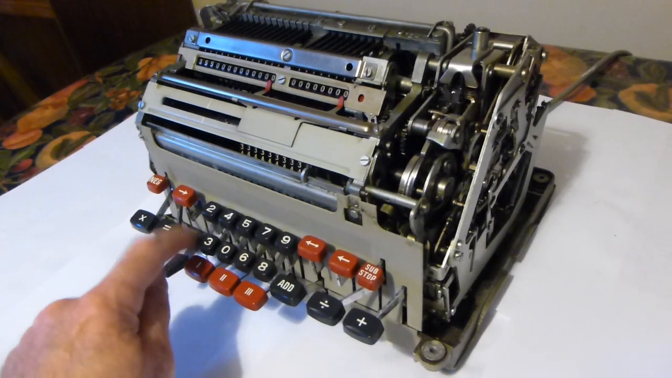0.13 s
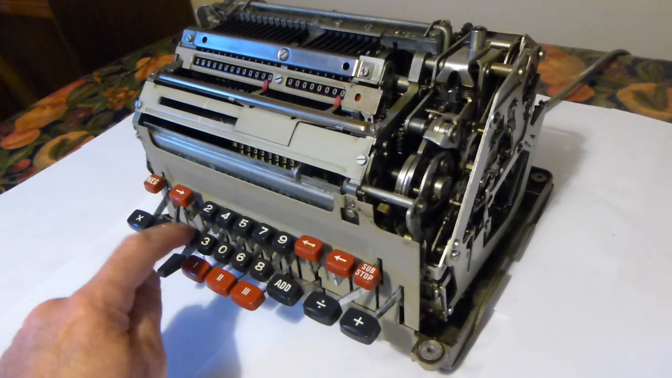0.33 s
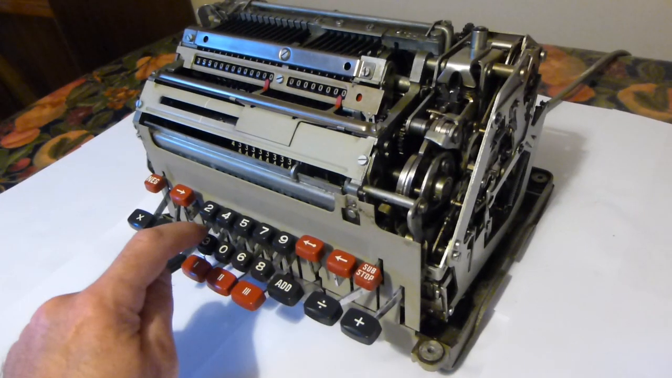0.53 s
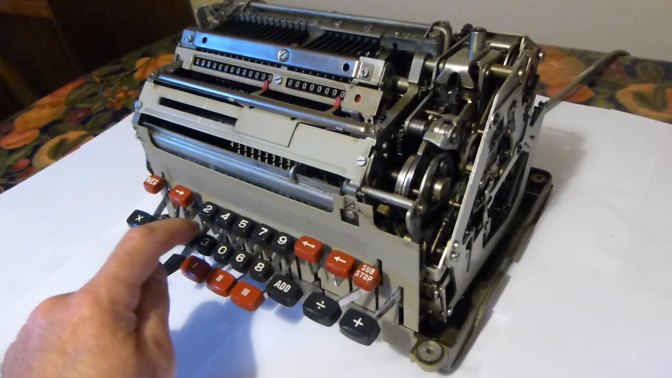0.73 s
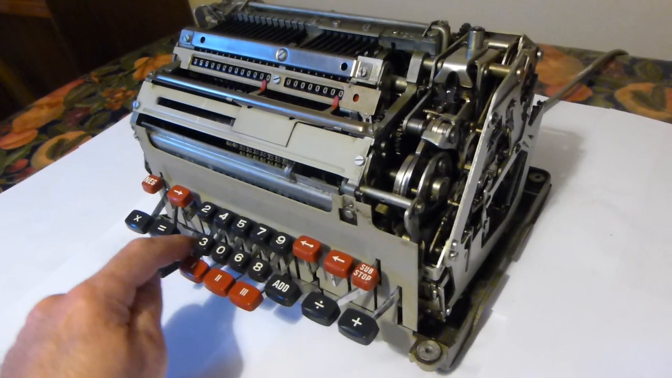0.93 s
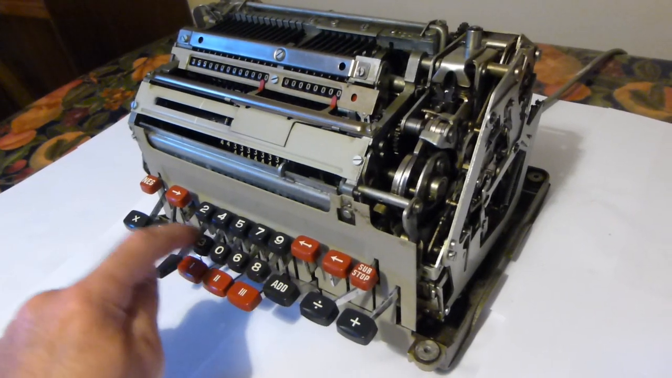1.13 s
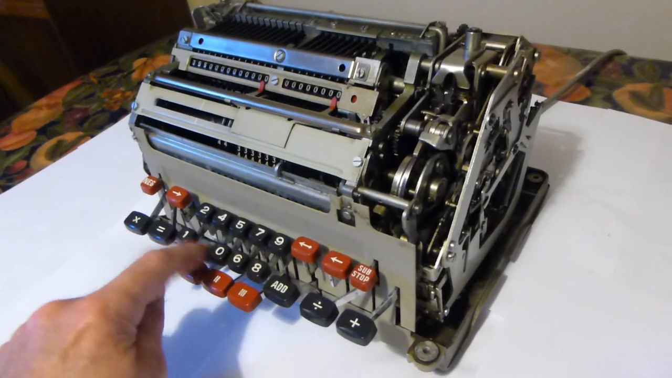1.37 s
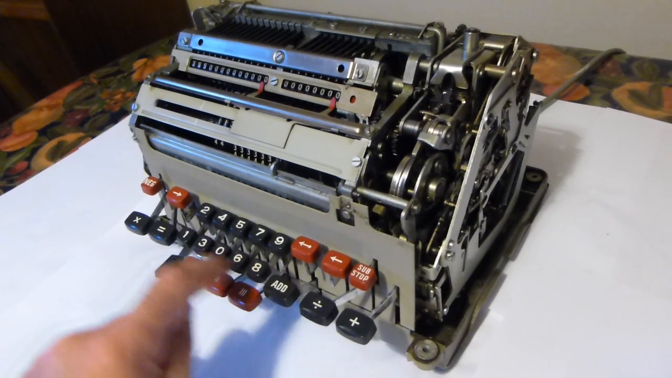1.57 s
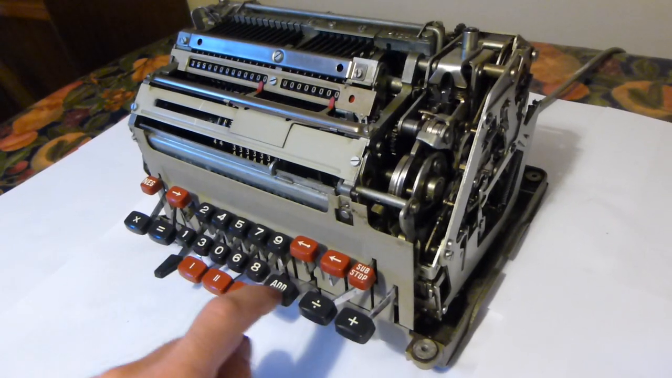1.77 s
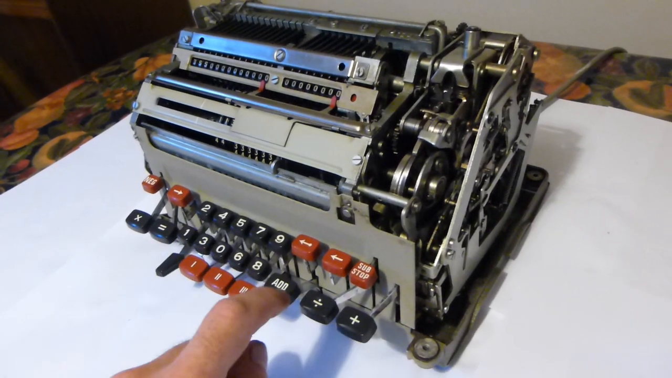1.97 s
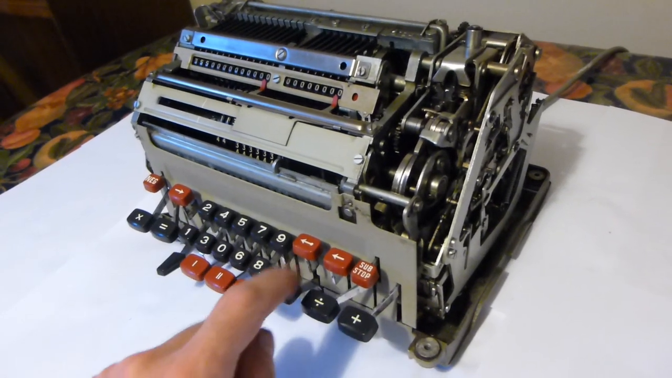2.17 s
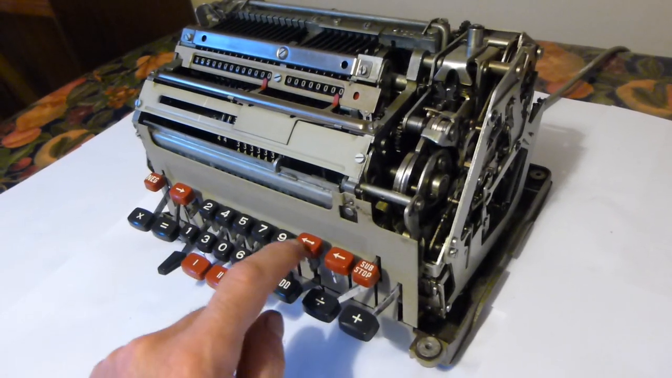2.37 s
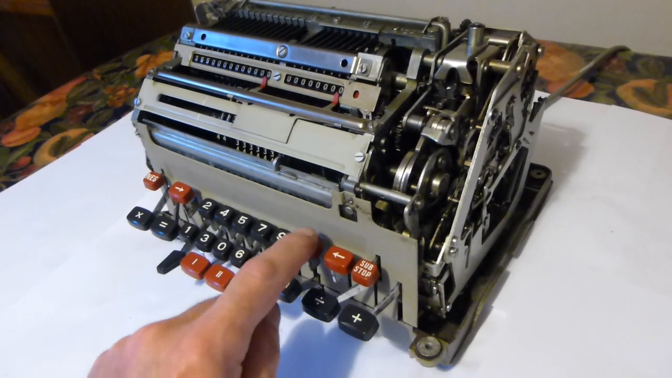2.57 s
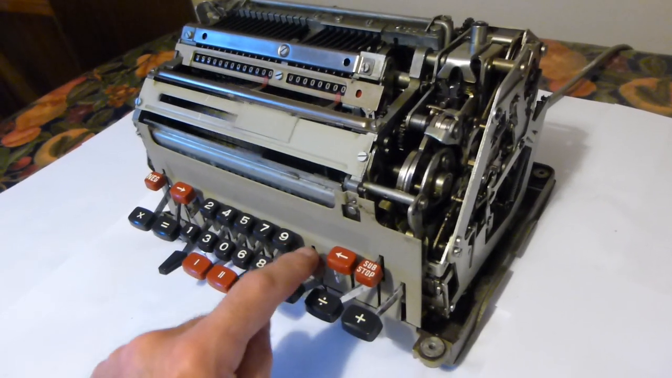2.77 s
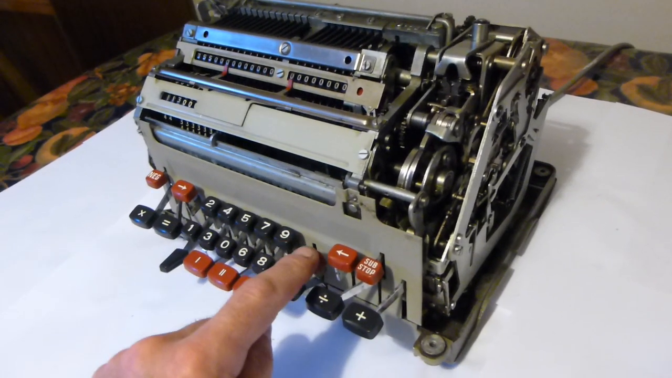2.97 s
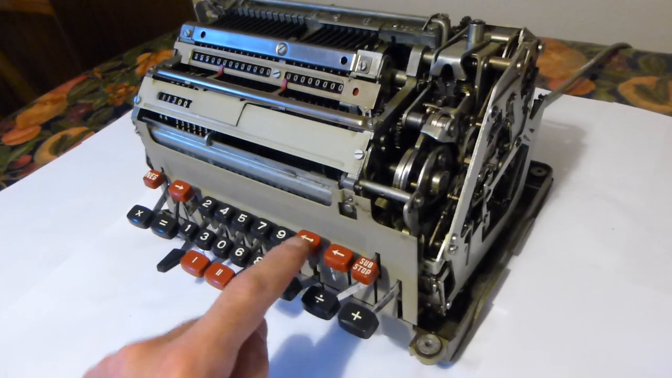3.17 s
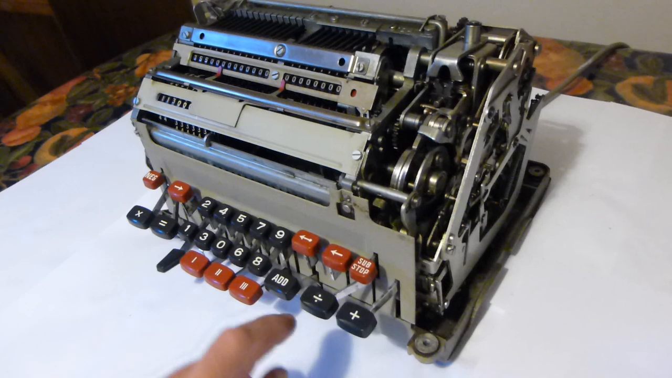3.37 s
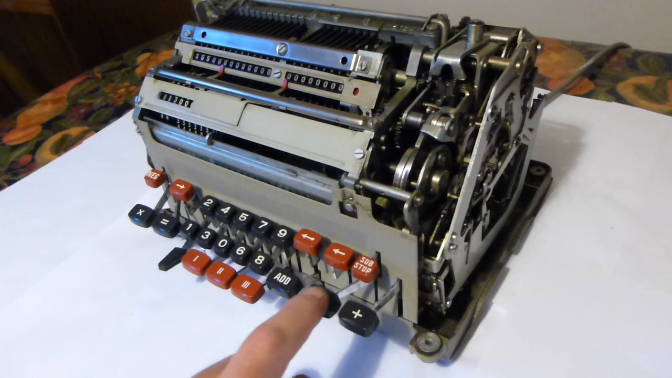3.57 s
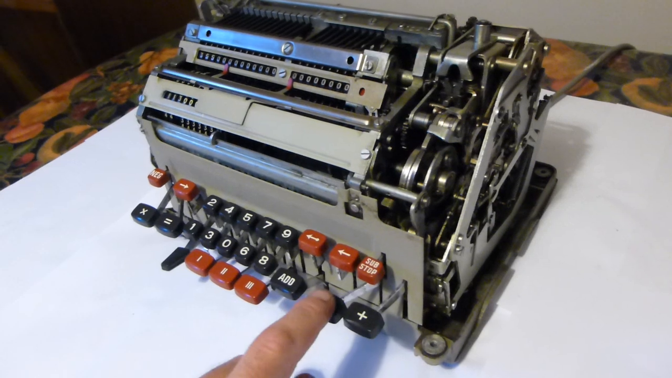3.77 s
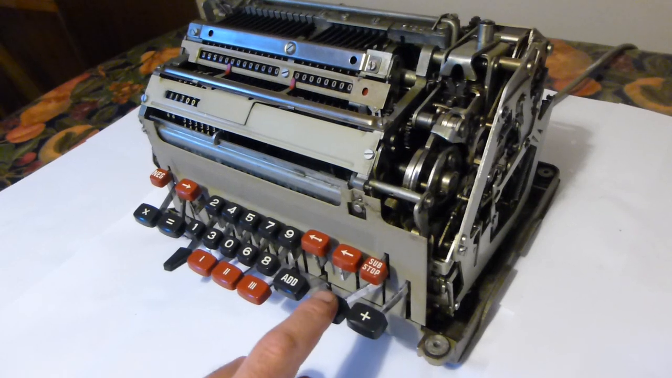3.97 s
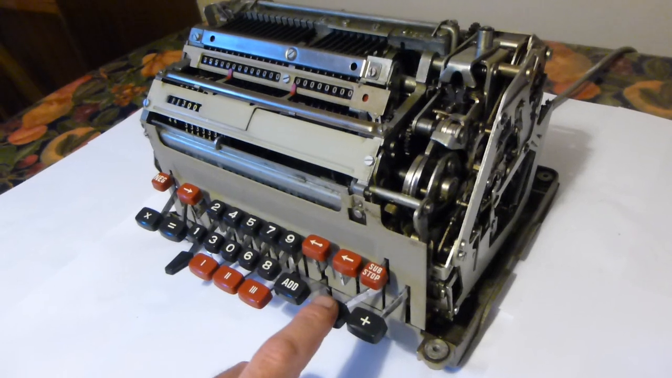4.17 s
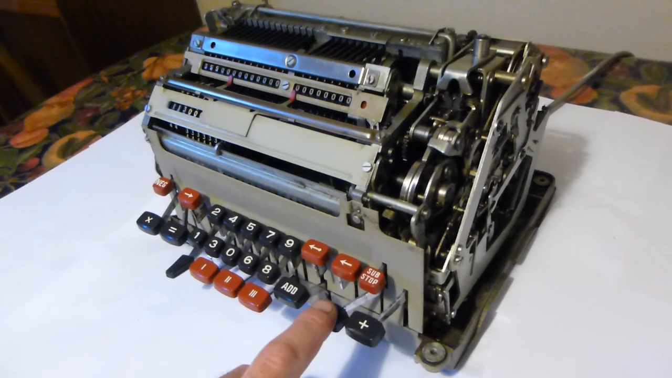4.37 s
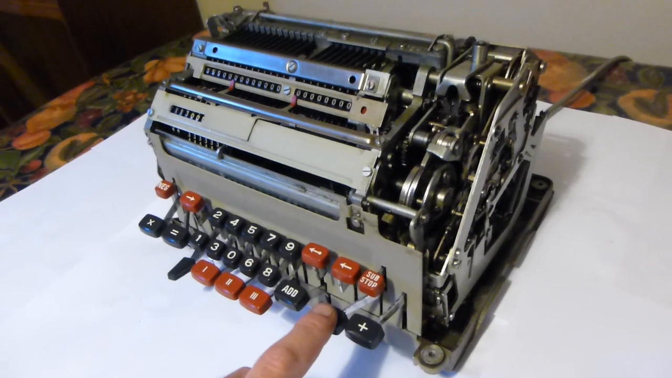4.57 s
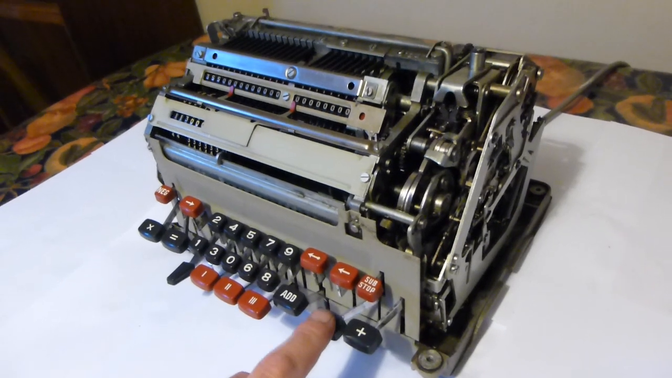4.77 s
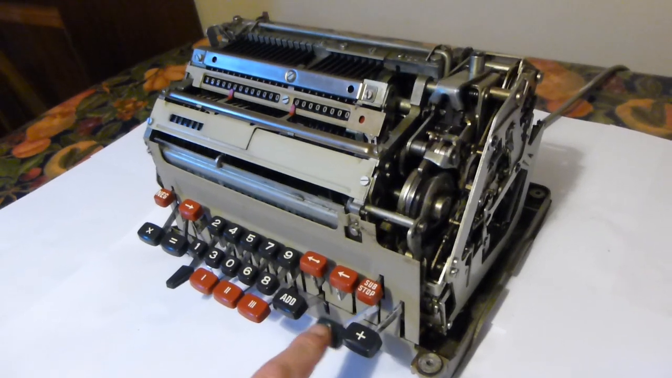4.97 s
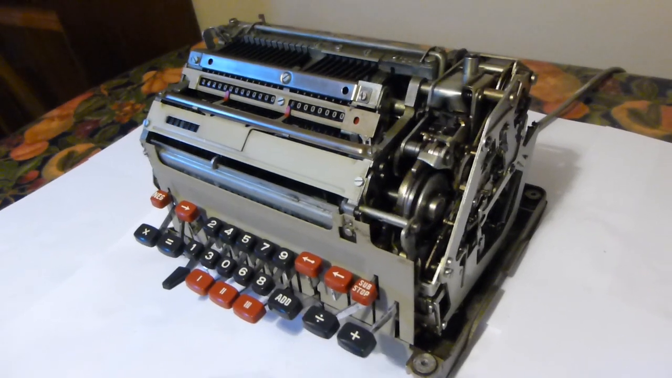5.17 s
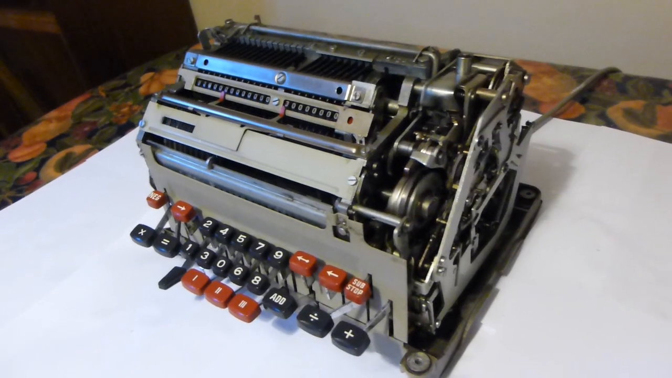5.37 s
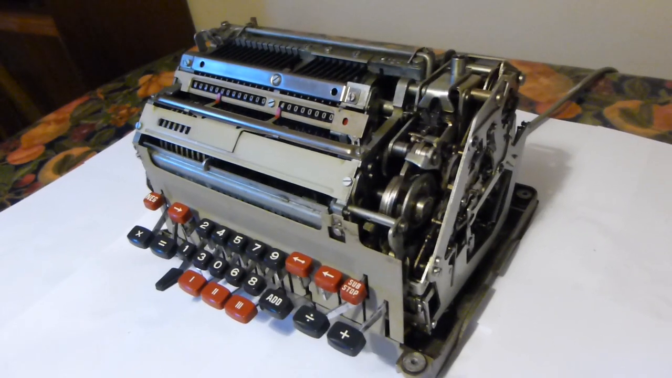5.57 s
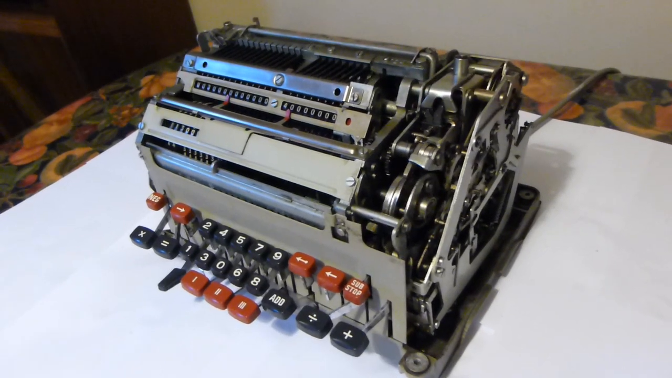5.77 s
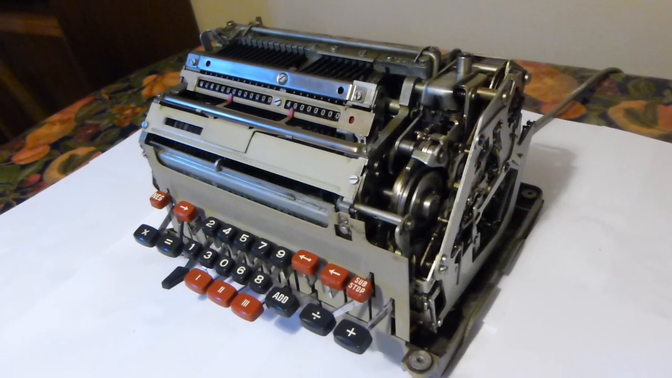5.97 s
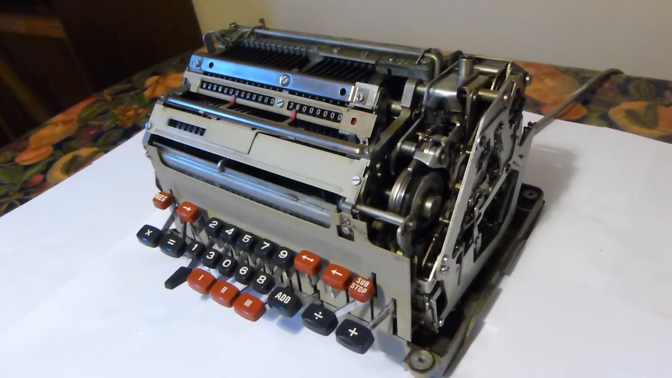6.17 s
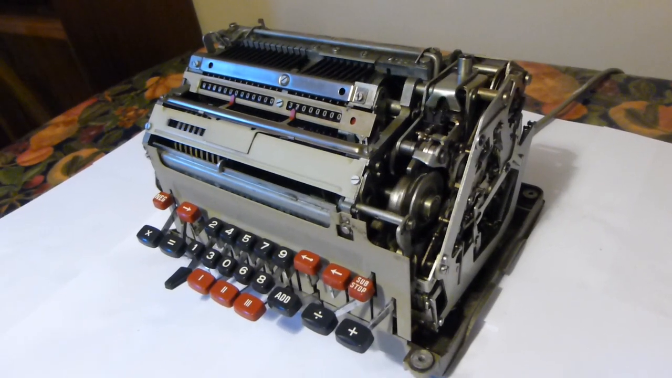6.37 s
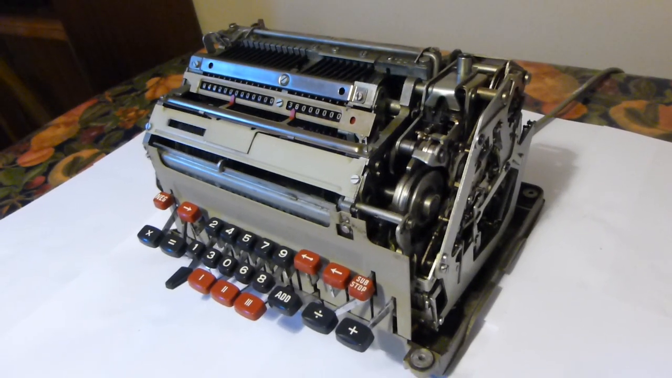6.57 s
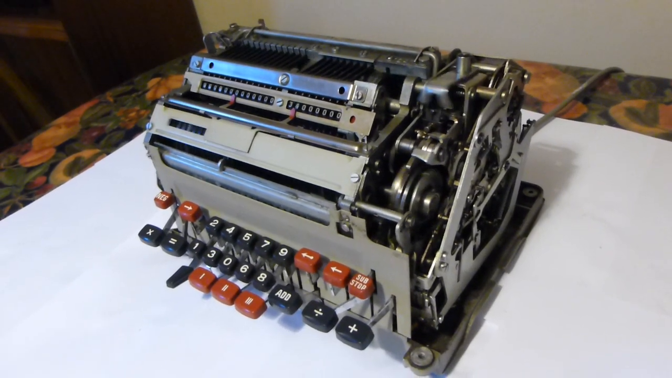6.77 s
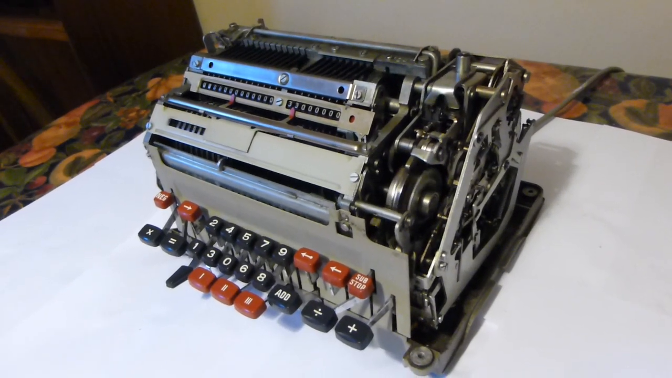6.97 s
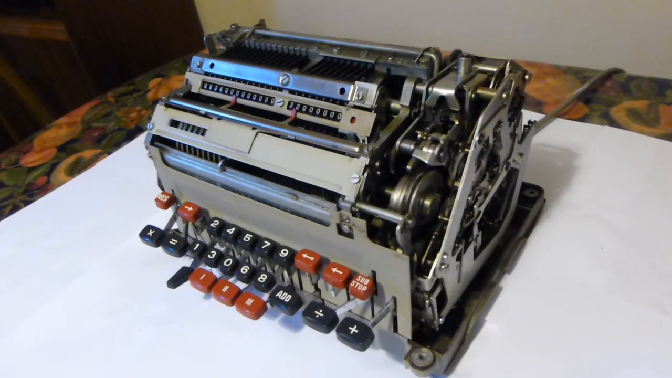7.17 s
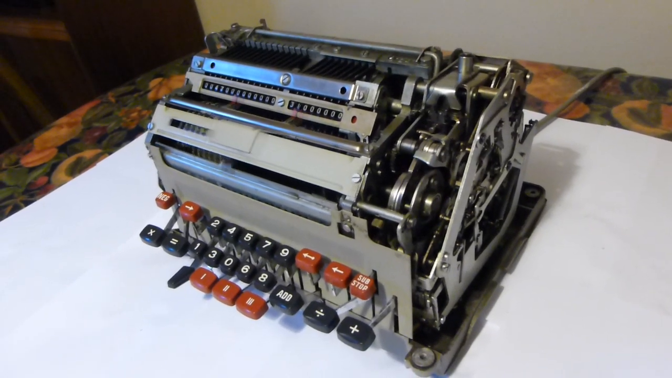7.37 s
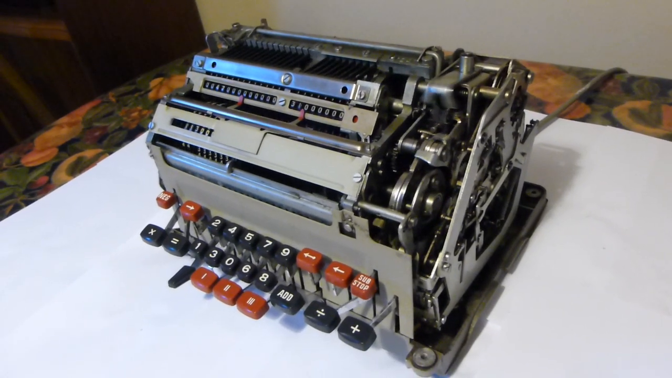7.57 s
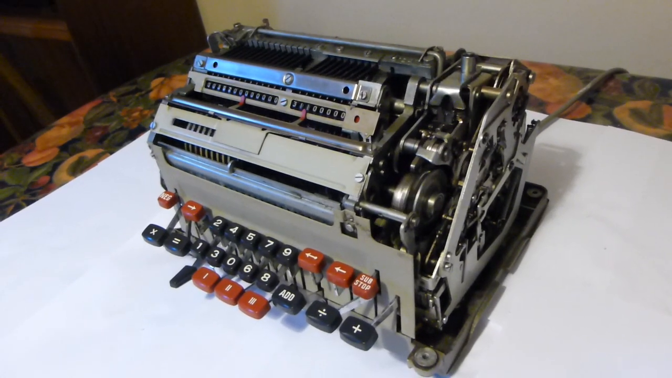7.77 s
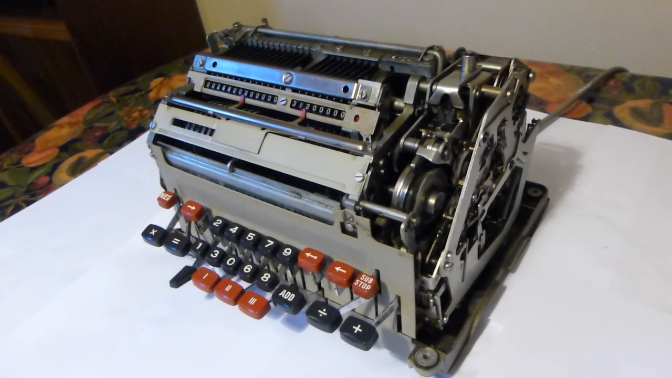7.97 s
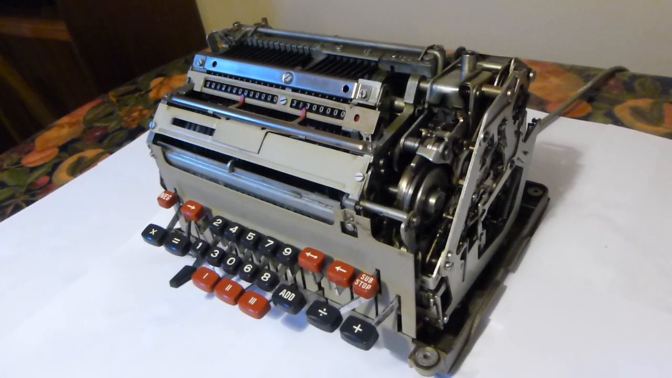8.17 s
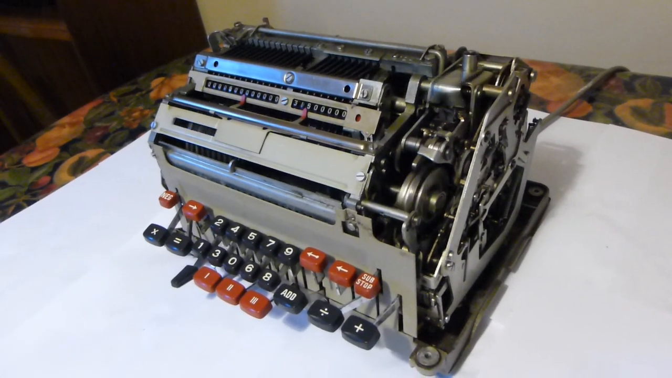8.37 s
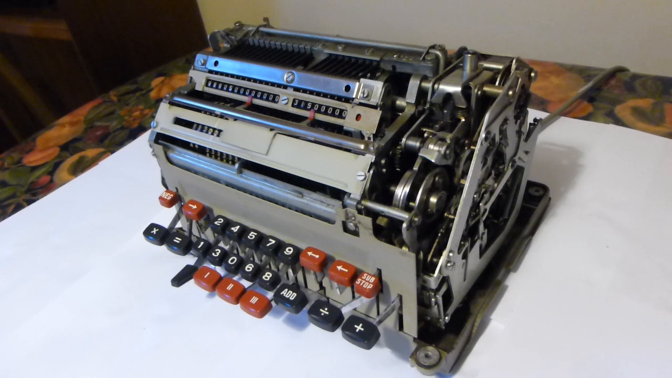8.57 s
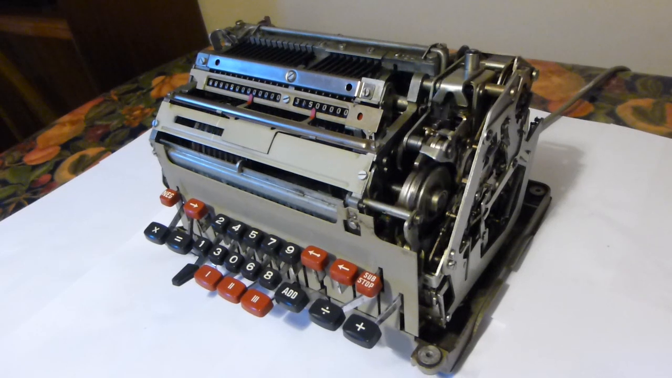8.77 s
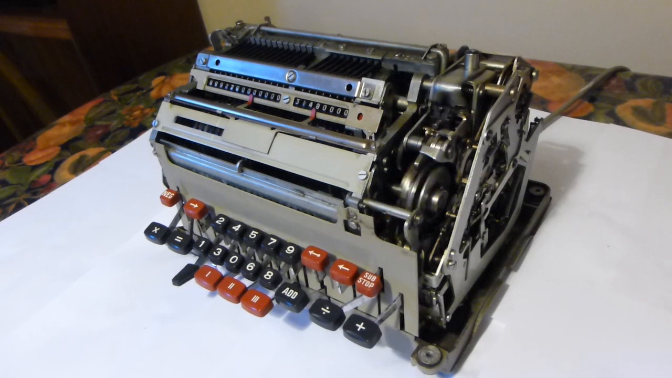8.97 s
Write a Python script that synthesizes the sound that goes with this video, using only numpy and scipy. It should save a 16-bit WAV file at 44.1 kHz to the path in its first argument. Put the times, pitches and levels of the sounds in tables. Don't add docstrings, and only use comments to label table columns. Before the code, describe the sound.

Sharp metallic key clacks and a ratcheting carriage slide, then an electric mechanical calculator clatters fast and rhythmically in a small furnished room.

```python
import sys
import numpy as np
from scipy import signal
from scipy.fft import rfft, irfft, next_fast_len
from scipy.io import wavfile

SR = 44100
rng = np.random.default_rng(int(sys.argv[2]) if len(sys.argv) > 2 else 0)


def attenuation_scalar(level_db):
    decades = np.asarray(level_db, float) / 20
    return 10 ** decades


def generate_wav(signal):
    frames = np.transpose(np.atleast_2d(signal))
    scaled = np.clip(frames, -1, 1) * 32767
    pcm = np.round(scaled).astype(np.int16)
    wavfile.write(sys.argv[1], SR, pcm)


N = 398223
MOTOR_ON_S = 4.885
LEFT_RIGHT = np.array([[1], [-1]])


def rms_one(x):
    return x / np.sqrt(np.mean(x ** 2) + 1e-20)


def at_hz(points, hz):
    points = np.array(points)
    return np.interp(np.log(hz), np.log(points[:, 0]), points[:, 1])


def filtered(x, order, hz, kind):
    return signal.sosfilt(signal.butter(order, hz, kind, fs=SR, output="sos"), x)


def ring(clicks, hz, t60):
    radius, w = attenuation_scalar(-60 / (t60 * SR)), 2 * np.pi * hz / SR
    return signal.lfilter([0, np.sin(w)], [1, -2 * radius * np.cos(w), radius ** 2], clicks + 1e-18)


def coloured(spectrum, likeness):
    size = next_fast_len(N)
    hz = np.maximum(np.arange(size // 2 + 1) * SR / size, 1)
    mid, side = rfft(rng.standard_normal((2, size))) * attenuation_scalar(at_hz(spectrum, hz)) * (hz > 20)
    alike = np.clip(at_hz(likeness, hz), -1, 1)
    both = np.sqrt(1 + alike) * mid + np.sqrt(1 - alike) * side * LEFT_RIGHT
    return rms_one(irfft(both, size)[:, :N])


def contacts(per_s, spread_db):
    sizes = attenuation_scalar(spread_db * np.minimum(rng.exponential(1, N), 4)) * rng.choice([-1, 1], N)
    return rms_one(sizes * (rng.random(N) < per_s / SR))


def lumps(per_s):
    steps = rng.standard_normal(N // 100 + 2)
    r = np.exp(-200 * np.pi * per_s / SR)
    slow = rms_one(signal.lfilter([1], [1, -2 * r, r * r], steps))
    return np.interp(np.arange(N) / 100, np.arange(len(steps)), slow)


# pitch_hz [Hz], level_db [dB per Hz]
AIR = [(15, -27.5), (25, -5.5), (33, -16.5), (92, -17), (206, -13), (236, -9), (270, -13), (384, -13),
       (545, -10.5), (607, -12.5), (1190, -14), (3620, -26.5), (5730, -21.5), (14000, -31), (16000, -33.5)]
# pitch_hz [Hz], likeness [-1 to 1]
AIR_LIKENESS = [(60, 0.98), (240, 0.62), (950, -0.42), (3770, 0.17), (15000, 0.26)]


def still_air():
    return attenuation_scalar(-62) * coloured(AIR, AIR_LIKENESS)


def room(x):
    t60_s, top_t60_s = .4, .22
    t = np.arange(int(.6 * SR)) / SR
    shared, apart = rng.standard_normal((2, len(t)))
    apart = filtered(apart, 1, 400, "high")
    echoes = shared + attenuation_scalar(-6) * apart * LEFT_RIGHT
    lows = filtered(echoes, 1, 3000, "low")
    echoes = lows * attenuation_scalar(-60 * t / t60_s) + (echoes - lows) * attenuation_scalar(-60 * t / top_t60_s)
    echoes *= np.clip(t / 0.01 - .5, 0, 1)
    echoes *= np.exp(-(t / 1.4) ** 3)
    echoes /= np.sqrt(np.sum(echoes ** 2) / 2)
    return signal.fftconvolve(x[None], echoes, axes=1)[:, :N]


# pitch_hz [Hz], level_db [dB per Hz]
RUMBLE = [(15, -30), (25, -7), (35, -7), (48, -16), (64, -23), (145, -8.5), (195, -12.5), (249, -8),
          (554, -13), (694, -11), (933, -15), (1600, -21), (2080, -45), (3520, -120)]
# pitch_hz [Hz], likeness [-1 to 1]
RUMBLE_LIKENESS = [(30, .6), (70, .78), (150, .93), (300, .92), (1000, .83)]


def motor_rumble():
    speed = np.clip((np.arange(N) / SR - MOTOR_ON_S) / 0.09, 0, 1)
    return speed * attenuation_scalar(-52.5 + 2.77 * lumps(28.0)) * coloured(RUMBLE, RUMBLE_LIKENESS)


# start_s [s], level_db [dB]
THUDS = [
    (2.504, -59),
    (2.536, -63),
    (2.62, -66),
    (3.771, -73),
    (3.829, -70),
]


def hand():
    starts = np.zeros(N)
    for start_s, level_db in THUDS:
        starts[round(start_s * SR)] = attenuation_scalar(level_db)
    puffs = signal.lfilter([1], [1, -np.exp(-1 / (.02 * SR))], starts) * rng.standard_normal(N)
    return 5 * filtered(puffs, 2, [90, 900], "band")


# pitch_hz [Hz], level_db [dB], t60_s [s]
BARS = [(238, -51, 1.5), (508, -56, 1.3), (522, -61, 1.1), (3350, -52, 0.5), (3520, -54, 1.0)]
# start_s [s], level_db [dB]
CARRIAGE = [
    (2.93, 11),
    (3.2, -17),
]


def bars():
    carriage = np.zeros(N)
    for start_s, level_db in CARRIAGE:
        carriage[round(start_s * SR)] = attenuation_scalar(level_db)
    swell_t60_s = np.log(1000) * 0.044
    return sum(attenuation_scalar(level_db) * (ring(carriage, hz, t60) - ring(carriage, hz, swell_t60_s))
               for hz, level_db, t60 in BARS)


# pitch_hz [Hz], level_db [dB], t60_s [s]
FRAME = [(131, -65.5, 1.9), (167, -54, 0.38), (237, -52.5, 0.15), (318, -49.5, 0.068), (420.4, -46, 0.064),
         (566, -41.5, 0.018), (682, -42, 0.041), (1230, -37, 0.03)]


def frame(heavy_blows):
    return sum(attenuation_scalar(level_db - 6) * ring(heavy_blows, hz, t60) for hz, level_db, t60 in FRAME)


# start_s [s], level_db [dB], pitch_hz [Hz]
JOLTS = [(4.985, -38.5, 140), (5.213, -34, 402), (5.673, -39, 770), (5.77, -40.5, 396), (5.816, -43, 190),
         (5.958, -45, 706), (6.114, -49, 237), (7.373, -40.5, 144), (7.446, -42, 398), (7.507, -37.5, 423),
         (7.711, -46, 347), (8.036, -44, 159), (8.337, -42, 233), (8.486, -42, 787), (8.8, -48, 660)]


def frame_jolts():
    out, t = np.zeros(N + SR), np.arange(int(.12 * SR)) / SR
    slam_jolts = [(s, level_db - 33.5, hz) for s, level_db, stop_db, hz in SLAMS]
    for start_s, level_db, hz in [*JOLTS, *slam_jolts]:
        at = round(start_s * SR)
        decay = attenuation_scalar(level_db + 2.5 - 60 * t / 0.075) * np.minimum(t / 0.0045, 1)
        out[at:at + len(t)] += decay * np.sin(2 * np.pi * hz * t)
    return out[:N]


# start_s [s], pitch_hz [Hz], level_db [dB], t60_s [s]
PINGS = [(5.592, 10450, -23, .2), (5.592, 11050, -26, .15), (5.592, 12700, -22, .16),
         (7.63, 13000, -35, .08), (3.138, 8400, -39, .2), (5.075, 5900, -33, .12), (0.56, 1490, -66, .4),
         (1.166, 4100, -27, .06), (0.436, 4300, -30, .06), (1.312, 11800, -34, .09),
         (1.312, 8700, -32, .05)]


def pings():
    out, t = np.zeros(N + SR), np.arange(int(.3 * SR)) / SR
    for start_s, hz, level_db, t60 in PINGS:
        at = round(start_s * SR)
        out[at:at + len(t)] += attenuation_scalar(level_db - 60 * t / t60) * np.sin(2 * np.pi * hz * t)
    return out[:N]


# start_s [s], level_db [dB], dull_db [dB]
DIGIT_KEYS = [(0.1753, -30, -17.5), (0.209, -18.5, -19), (0.2184, -10, -20.5), (0.2338, -13, -15.5),
              (0.251, -12, -38), (0.2585, -24.5, -5), (0.394, -27.5, -7.5), (0.4146, -16, -12.5),
              (0.431, -8.5, -35), (0.442, -24.5, -5), (0.9328, -45.5, -13), (0.9554, -35.5, -9),
              (0.969, -20, -22.5), (0.9777, -12.5, -22.5), (0.9974, -11, -29.5), (1.014, -12, -15.5),
              (1.129, -20.5, -5.5), (1.1463, -13.5, -14.5), (1.1633, -11.5, -29), (1.3013, -18.5, -15.5),
              (1.3139, -12.5, -15.5), (1.3389, -7.5, -17.5), (1.3606, -13, -27.5), (1.4755, -18, -13),
              (1.481, -11.5, -17), (1.504, -16, -21.5), (1.5128, -14, -25)]
# start_s [s], level_db [dB], dull_db [dB], bright_db [dB]
WORK_KEYS = [(2.353, -59, -12.5, 2), (2.7055, -57.5, -11, -4), (2.734, -42.5, -14, -11.5),
             (2.7523, -40, -26, -19), (2.764, -33, -21, -5), (2.778, -18.5, -22.5, -3),
             (2.797, -21.5, -39, -15.5), (2.8464, -12, -31, 4), (2.869, -16, -10, -14.5),
             (2.9093, -8.5, -15.5, -6), (2.924, -23.5, -33, -6), (3.1365, -22, -17, -6),
             (3.1843, -18, -6.5, -6.5), (3.199, -13, -32, -6.5), (3.7802, -46, -25, -4),
             (4.866, -35.5, -12, -13), (4.882, -14, -57, -4), (4.892, -27.5, -42, -8)]


def key_blows():
    chatter_s = 0.012
    digits = [(*row, -6, chatter_s) for row in DIGIT_KEYS]
    return digits + [(*row, chatter_s) for row in WORK_KEYS]


# start_s [s], level_db [dB], dull_db [dB], bright_db [dB]
SNAPS = [(0.2324, -6, -17.5, -.5), (0.2575, -16.5, -27.5, 4.5), (0.4148, -19, -8, -4),
         (0.4343, -10.5, -13.5, -2), (0.995, -10.5, -7.5, 2), (1.0177, -22.5, -12, 1.5),
         (1.1455, -4, -14.5, -7), (1.1666, -5.5, -12, -1), (1.3662, -15.5, -10.5, 5.5),
         (1.4836, -5, -10.5, -8), (2.782, -9.5, -22.5, 2), (2.8452, -1.5, -22, -5.5), (2.909, -12, -5.5, 3),
         (3.1861, -15, -12, -8), (4.8832, 1, -22, 0), (2.9245, -14, -22, -3.5), (7.628, -16.5, -27, 4)]


def hard_stops():
    lag_s, dull_db, bright_db = .004, -20, -6.5
    latches = [(s + lag_s, stop_db, dull_db, bright_db)
               for s, level_db, stop_db, *rest in [*SLAMS, *CLUTCH]]
    return [(s, level_db + 1, *colour, .0014) for s, level_db, *colour in [*SNAPS, *latches]]


# start_s [s], level_db [dB], dull_db [dB], bright_db [dB], chatter_s [s]
SLIDES = [
    (2.785, -22.5, -8.5, 1.5, 0.036),
    (2.86, -15.5, -15, -6, 0.3),
    (5.035, -20, -20, -6, 0.091),
    (5.68, -21, -23, -3, 0.074),
    (7.38, -14.5, -22.5, -2.5, 0.1),
    (8.5, -16.5, -23, -1, 0.092),
]


def slide_blows():
    return list(SLIDES)


# start_s [s], level_db [dB], stop_db [dB]
CLUTCH = [(4.9565, -14.5, -38), (4.9858, -11, -11), (5.0182, -6.5, -12), (5.056, -16.5, -26),
          (5.6547, -18, -33), (5.6713, -14.5, -12.5), (5.694, -14.5, -24), (5.8992, -15, -36),
          (5.9119, -16, -16), (5.9591, -11, -9.5), (7.3677, -8.5, -19), (7.628, -30.5, -26),
          (7.6694, -23.5, -39), (7.7053, -9, -30.5), (8.4863, -11.5, -22.5), (8.5222, -27.5, -34),
          (8.7436, -27, -35), (8.7558, -19, -29), (8.7718, -33, -26), (8.801, -11, -14)]


def clutch_blows():
    return [(s, level_db, -20, -3.5, 0.021) for s, level_db, stop_db in CLUTCH]


# start_s [s], level_db [dB]
STEPS = [
    (5.771, 0),
    (7.5047, -2),
    (8.613, -1),
]
# after_s [s], level_db [dB], dull_db [dB], bright_db [dB], chatter_s [s]
ESCAPEMENT = [
    (0, -15.5, -18, -3, 0.025),
    (0.0324, -12.5, -16, -4, .005),
    (0.092, -16.5, -7, -18.5, .004),
]


def step_blows():
    return [(s + after_s, step_db + level_db, *colour)
            for s, step_db in STEPS for after_s, level_db, *colour in ESCAPEMENT]


# start_s [s], level_db [dB]
PINS = [(5.1823, -18.5), (5.2378, -19.5), (5.3314, -16.5), (5.3778, -17), (5.4963, -20.5), (5.525, -21.5),
        (6.1127, -13), (6.2804, -20), (6.431, -28.5), (6.4384, -18), (6.571, -18.5), (6.592, -27),
        (6.746, -26), (6.755, -26.5), (6.8917, -18), (7.0476, -16), (7.2262, -21.5), (7.8499, -19.5),
        (8.0237, -23.5), (8.1024, -27), (8.1817, -30), (8.3192, -24.5), (8.3381, -26), (8.9513, -20),
        (8.971, -23.5)]


def pin_blows():
    return [(s, level_db, -21, -4, 0.027) for s, level_db in PINS]


# start_s [s], level_db [dB], stop_db [dB], pitch_hz [Hz] of the jolted frame
SLAMS = [(5.1141, -11, -18.5, 436), (5.2707, -7.5, -12, 417), (5.428, -8.5, -15, 146),
         (5.5851, -7, -9, 334), (6.0246, -11.5, -24, 262), (6.1806, -9, -16.5, 237),
         (6.3401, -10, -12, 328), (6.4959, -9.5, -16, 694), (6.6541, -10.5, -31, 307),
         (6.811, -11.5, -9, 239), (6.9723, -9, -21, 670), (7.1258, -9.5, -31, 318),
         (7.2848, -10.5, -12.5, 253), (7.8006, -9.5, -24, 160), (7.9573, -10.5, -27, 407),
         (8.1170, -10.5, -21, 235), (8.273, -10, -28, 403), (8.4299, -10.5, -26.5, 676),
         (8.8702, -11.5, -21.5, 695), (9.025, -14, -14, 257)]


def slam_blows():
    return [(s, level_db, -24.5, 0, 0.015) for s, level_db, stop_db, hz in SLAMS]


# start_s [s], level_db [dB]
GEARS = [(4.97, -37), (5.05, -37.5), (5.69, -32), (5.96, -32), (7.54, -35), (8.3, -36.5), (8.5, -33.5),
         (8.68, -36.5), (9.03, -34.5)]


def gear_rattle():
    t = np.arange(N) / SR
    start_s, level_db = np.transpose(GEARS)
    running = np.clip((t - MOTOR_ON_S) / 0.0113, 0, 1)
    effort_db = np.maximum(np.interp(t, start_s, level_db), -39)
    return running * attenuation_scalar(effort_db - 2.0 + 2.87 * lumps(23))


# pitch_hz [Hz], level_db [dB per Hz]
STEEL = [(240, -39), (400, -17), (562, -19), (697, -44), (814, -5.5), (1400, -2.5), (4110, 6), (4440, 6),
         (5780, 8), (10700, 3), (14400, -1.5), (16000, 0)]


def mechanism():
    ring_cycles, chatter_level_db = 16, -12
    tail_db, loaded_tail_db = -14, -14
    rattle = gear_rattle()
    pitches = np.geomspace(450, 15500, num=40)
    loudness = attenuation_scalar(at_hz(STEEL, pitches)) * pitches
    loudness /= np.sqrt(np.sum(loudness ** 2 * ring_cycles / pitches) * SR / 83)
    dull = np.clip(np.log2(4000 / pitches) / 1.4, 0, 1)
    bright = np.clip(np.log2(pitches / 6000), 0, 1)
    blows = (slide_blows() + key_blows() + slam_blows() + pin_blows()
             + clutch_blows() + step_blows() + hard_stops())
    cracks, shaking = np.zeros((2, len(pitches), N), np.float32)
    luck = rng.standard_normal((len(blows), len(pitches)))
    for (start_s, level_db, dull_db, bright_db, chatter_s), own in zip(blows, luck):
        at, length = round(start_s * SR), np.clip(chatter_s, .001, .15)
        t = np.arange(min(int(.2 * SR), N - at)) / SR
        colour = attenuation_scalar(level_db + dull * (dull_db + 19) + bright * (bright_db + 9.5))
        cracks[:, at] += colour * attenuation_scalar(2 * own) * .002 / (length + .001)
        burst = np.exp(-(t / length) ** 2.5)
        tail = attenuation_scalar(tail_db + loaded_tail_db * (start_s > MOTOR_ON_S)) * np.exp(-t / 0.055)
        tail *= min(length / 0.018, 1)
        fading = (burst + tail) * np.minimum(t / (0.11 * length), 1)
        shaking[:, at:at + len(t)] += (colour * attenuation_scalar(chatter_level_db + 0.66 * own))[:, None] * fading
    chatter, teeth = contacts(10000, spread_db=2.5), contacts(12000, spread_db=3.0)
    dealt = rng.integers(0, 3, N)
    places = rng.random(len(pitches)) * (-1) ** (np.arange(len(pitches)) // 2)
    out = np.zeros((2, N))
    for k, hz in enumerate(pitches):
        struck = cracks[k] + (shaking[k] * chatter + rattle * teeth) * (dealt == k % 3)
        part = loudness[k] * ring(struck, hz, ring_cycles / hz) * (-1) ** k
        out += part * attenuation_scalar(3 * places[k] * LEFT_RIGHT)
    heavy_blows = shaking[0] * chatter + 0.3 * cracks[0]
    return out, heavy_blows


def scene():
    steel, heavy_blows = mechanism()
    steel = filtered(steel, 2, 330, "high")
    body = frame(heavy_blows) + frame_jolts() + pings() + hand()
    machine = steel + body + bars() + attenuation_scalar(-5.5) * room(steel.mean(axis=0) + body)
    thin = filtered(machine, 3, 115, "high")
    return thin + motor_rumble() + still_air()


def low_pass(x):
    return signal.sosfilt(signal.butter(12, 16480, fs=SR, output="sos"), x)


def record(dry):
    cut = signal.sosfilt(signal.cheby2(14, 40, 15950, fs=SR, output="sos"), dry)
    mix = 1.212 * np.tanh(cut / 1.266) - .0029
    return low_pass(mix)


dry = scene()
out = record(dry)
generate_wav(out)
```